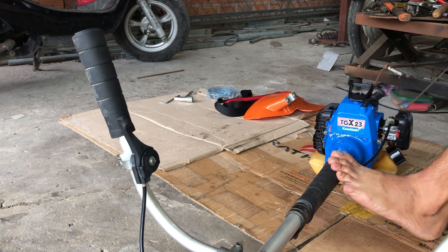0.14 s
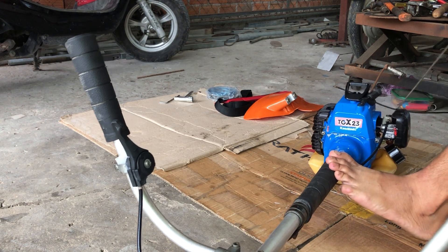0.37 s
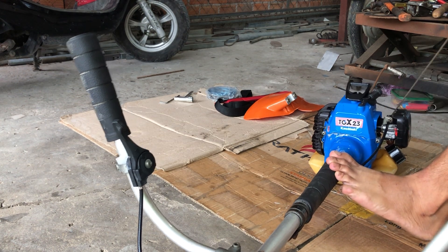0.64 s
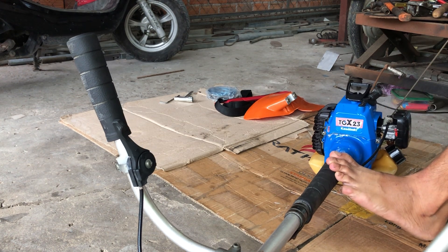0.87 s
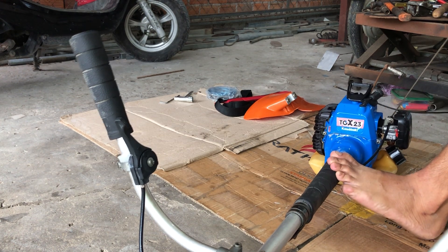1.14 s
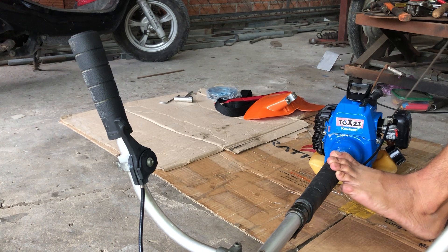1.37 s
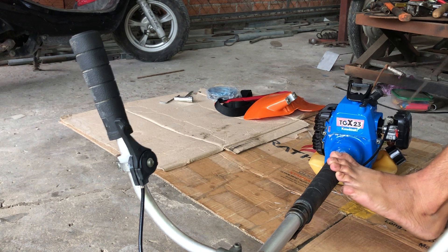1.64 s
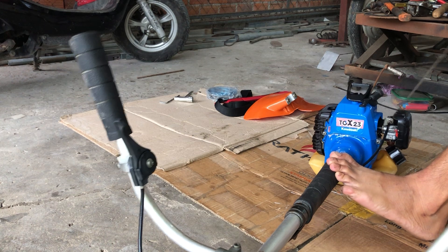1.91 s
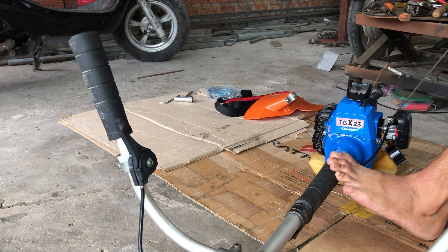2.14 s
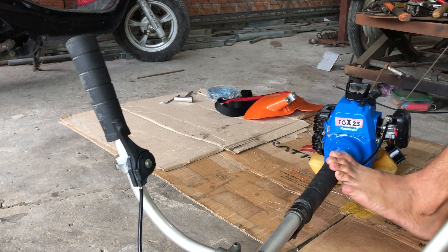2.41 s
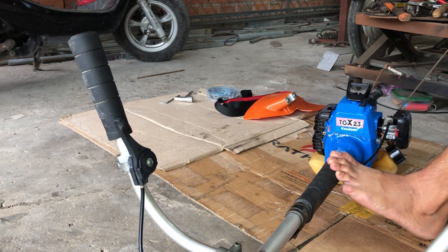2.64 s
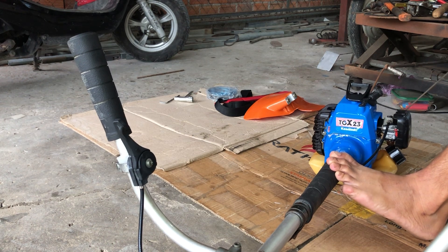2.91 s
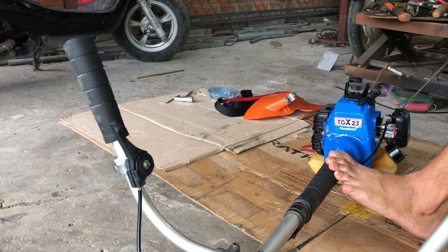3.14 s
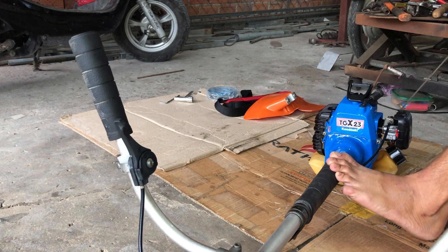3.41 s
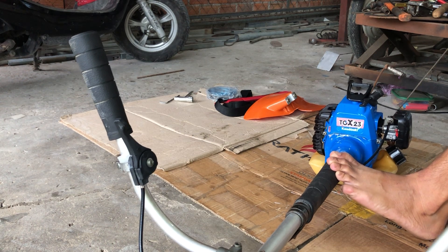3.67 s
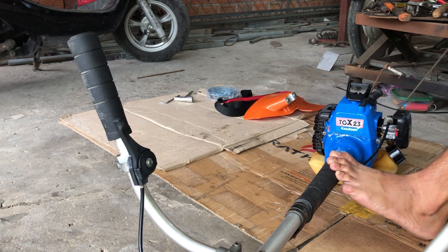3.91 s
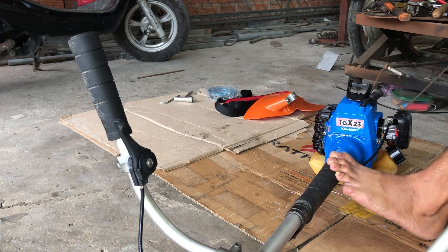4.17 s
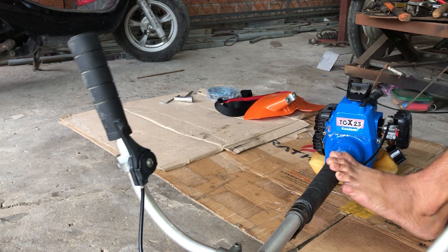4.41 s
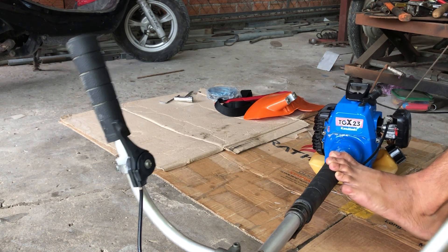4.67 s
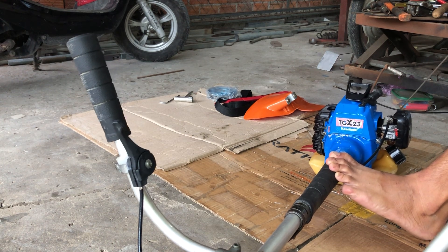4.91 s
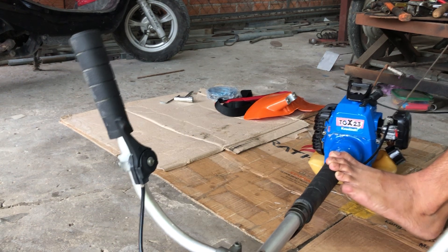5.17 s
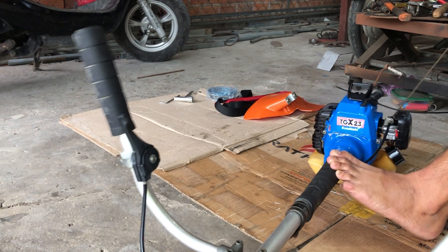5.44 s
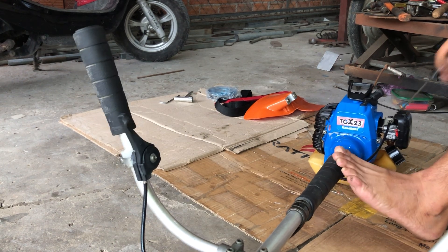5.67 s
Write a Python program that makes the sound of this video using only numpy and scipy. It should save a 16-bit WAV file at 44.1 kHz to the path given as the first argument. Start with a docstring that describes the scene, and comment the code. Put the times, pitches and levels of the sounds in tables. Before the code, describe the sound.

Close view of a garden-tool engine on a concrete garage floor. Three or four separated compression thumps with scraping and breathy puffs come first, then a quick springy ratchet whirr and a hard clack. This repeats twice more, until a stronger thump lights the engine and a loud, fast, uneven putter with rattling metal runs to the end. Light garage echo over quiet steady rumble.

```python
"""A small two-stroke engine is turned over by its starter rope on a garage floor, then catches and idles.
Each slow turn is a noise clack over top dead centre, an exhaust thump of damped muffler modes and a thin puff of
air. Between pulls the rope rewinds over a ratchet of ticks and ringing spring modes, and the pawl bangs in again.
Once firing, clatter, exhaust beats and puffs come forty-odd times a second, with loose metal rattling.
Soft tank knocks, a steady low rumble and the reverberation of the garage complete the scene."""
import sys
import numpy as np
from scipy import signal
from scipy.fft import rfft, irfft
from scipy.io import wavfile

SR = 44100
rng = np.random.default_rng(int(sys.argv[2]) if len(sys.argv) > 2 else 0)


def voltage_ratio(decibels):
    """Convert decibels (scalar or array-like) to amplitude ratios, 20 dB per decade."""
    exponent = np.asarray(decibels, float) / 20
    return 10 ** exponent


def waveform_to_disk(signal):
    """Save audio, clipped to [-1, 1], as 16-bit WAV at the path in sys.argv[1]."""
    frames = np.transpose(np.atleast_2d(signal))
    scaled = np.clip(frames, -1, 1) * 32767
    samples = np.round(scaled).astype(np.int16)
    wavfile.write(sys.argv[1], SR, samples)


N = 255950

# the pawl catches the flywheel: start_s, level_db
PAWL_CATCHES = [(1.64, -17.5), (2.993, -20), (4.217, -19)]
# noise spectra of the clack, the starter housing and rubbing parts: frequency_hz, level_db
CLACK_COLOUR = [(240, -41), (400, -24.5), (687, 1.5), (1460, -18), (2020, 1.5), (2360, -7.5), (5270, -13.5),
                (5870, -13), (6950, -19.5), (8630, -10.5), (10200, -24), (12700, -15.5), (16000, -26)]
HOUSING_COLOUR = [(240, -7), (400, -8), (475, -10.5), (596, 8), (842, 4), (947, -5), (1200, 7),
                  (1300, -4.5), (1770, -7), (2280, 2), (3500, -15.5), (4550, -83), (7700, -120)]
RUBBING_COLOUR = [(240, -59), (400, -24), (949, 0), (1060, -59), (1220, 5), (1560, -0.5), (1960, 0.5),
                  (3530, -9.5), (10100, -17), (11000, -14.5), (16000, -69)]


def rms_one(x):
    """Normalisation: scale a signal to unit rms."""
    return x / np.sqrt(np.mean(x ** 2) + 1e-20)


def coloured(spectrum, peaks=()):
    """Spectral shaping: white noise is weighted by a spectrum and resonant bumps, to unit rms."""
    hz = np.arange(N // 2 + 1) * SR / N + 1
    spectrum_hz, spectrum_db = np.transpose(spectrum)
    db = np.interp(np.log(hz), np.log(spectrum_hz), spectrum_db)
    for centre_hz, width_hz, top_db in peaks:
        db = db + top_db / (1 + (2 * (hz - centre_hz) / width_hz) ** 2)
    return rms_one(irfft(rfft(rng.standard_normal(N)) * voltage_ratio(db), N))


def clicks(s, db):
    """Impulse excitation: one single-sample impulse per event."""
    out, at = np.full(N, 1e-18), (np.asarray(s) * SR).astype(int)
    inside = (at >= 0) & (at < N)
    out[at[inside]] += voltage_ratio((db + 0 * at)[inside])
    return out


def swell(x, rise_s, t60):
    """Exponential relaxation: each impulse becomes an envelope that rises and dies away."""
    rise_pole, decay_pole = np.exp(-1 / (rise_s * SR)), voltage_ratio(-60 / (t60 * SR))
    decaying = signal.lfilter([1], [1, -decay_pole], x)
    return signal.lfilter([1 - rise_pole], [1, -rise_pole], decaying)


def approach(x, t60):
    """Time-reversed relaxation: an envelope grows towards each impulse."""
    return swell(x[::-1], rise_s=0.00051, t60=t60)[::-1]


def later(x, s):
    """Propagation delay: the signal arrives s seconds later."""
    return np.concatenate([np.zeros(int(s * SR)), x])[:N]


def grain(rough_db, hz):
    """Amplitude modulation: low-passed noise makes the level of rubbing contact uneven."""
    slow = signal.sosfilt(signal.butter(2, hz, fs=SR, output="sos"), rng.standard_normal(N))
    return voltage_ratio(rough_db * rms_one(slow))


def ring(x, modes):
    """Modal synthesis: the input sets decaying sines ringing."""
    out = 0
    for hz, db, t60 in modes:
        radius, angle = voltage_ratio(-60 / (t60 * SR)), 2 * np.pi * hz / SR
        poles = [1, -2 * radius * np.cos(angle), radius * radius]
        out = out + signal.lfilter([0, voltage_ratio(db) * np.sin(angle)], poles, x)
    return out


def burst(rows, colour, rise_s, t60, trim_db, rough_db=2.5):
    """Transient noise: each event is a short uneven burst of one colour."""
    s, db = np.transpose(rows)[:2]
    return swell(clicks(s, db + trim_db), rise_s, t60) * coloured(colour) * grain(rough_db, hz=320)


def rumble():
    """Stationary noise: far low rumble with narrow resonances and a slowly wandering level."""
    # noise spectrum: frequency_hz, level_db
    rumble_colour = [(18, -69), (30, -9), (124, 0.5), (266, -14), (649, -22), (740, -21), (962, -26),
                     (1040, -27.5), (3490, -37), (8980, -43), (16000, -59)]
    # resonances: centre_hz, width_hz, height_db
    rumble_peaks = [(111.6, 4.3, 13.6), (159, 4.7, 1.3), (168, 7, 12), (244, 14, 0.62), (9250, 530, 9.6)]
    return voltage_ratio(-46.5) * coloured(rumble_colour, rumble_peaks) * grain(rough_db=1.5, hz=1.54)


def clack(top):
    """Impact noise: the piston rocks over top dead centre, with a swell leading up to each impact."""
    envelope = swell(top, rise_s=0.00027, t60=0.066) + 0.66 * approach(top, t60=0.05)
    return envelope * coloured(CLACK_COLOUR) * grain(rough_db=2.0, hz=415)


def exhaust(blows, open_s, modes):
    """Resonator excitation: gas pulses through the opening port ring the muffler."""
    pulse = signal.windows.hann(int(open_s * SR))
    return -ring(np.convolve(blows, pulse)[:N] / (open_s * SR), modes)


def thump(s, db):
    """Cavity modes and early reflections: each slow exhaust blow rings the muffler and returns duller."""
    # modes of the muffler: frequency_hz, level_db, t60_s
    muffler = [(108.2, -4, 0.17), (178.7, -2, 0.1), (221.2, 0.5, 0.037), (355, -2.5, 0.014),
               (452, -18.5, 0.017), (564, -1.5, 0.024), (670, -18, 0.039), (890, -97, 0.015)]
    # floor and walls near the outlet: delay_s, gain
    exhaust_echoes = [(.0135, .6), (.0255, .28), (.036, .15)]
    gas = exhaust(clicks(s + 0.00373, db - 3.5), open_s=0.0019, modes=muffler)
    # a small outlet sends out little deep bass
    gas = signal.sosfilt(signal.butter(2, 95, "high", fs=SR, output="sos"), gas)
    dull = signal.sosfilt(signal.butter(1, 350, fs=SR, output="sos"), gas)
    return gas + sum(gain * later(dull, lag_s) for lag_s, gain in exhaust_echoes)


def casing_knocks(s, db):
    """Impact noise: the casing jumps on the floor, a knock and a weaker second one."""
    struck = clicks(s + 0.00044, db - 31.0) + clicks(s + 0.0221, db - 43.5)
    colour = coloured(CLACK_COLOUR) + 1.36 * coloured(HOUSING_COLOUR)
    return swell(struck, rise_s=0.00047, t60=0.32) * colour


def carburettor_puff(s):
    """Turbulent flow noise: air squeezed past the carburettor, after which the air box sings on."""
    # noise spectrum of the puff: frequency_hz, level_db
    puff_colour = [(710, 2), (1200, -3), (1380, -6), (1930, 7), (3320, -3), (4410, 7), (5130, -4),
                   (5780, 0.5), (6870, -8), (8350, 3), (9820, -10.5), (12900, 10), (16000, -18)]
    puff_db = -27   # ahead of the trims
    rows = np.transpose([s, puff_db + 0 * s])
    puff = burst(rows, puff_colour, rise_s=0.0038, t60=0.057, trim_db=-2.5, rough_db=0.0)
    tail = burst(rows, puff_colour, rise_s=0.017, t60=0.3, trim_db=-23.5)
    hum = ring(swell(clicks(s, puff_db - 33.5), rise_s=0.0019, t60=0.018), [(221.6, 0, 0.35)])
    return puff + tail + hum


def rubbing(top, top_s, puff_s):
    """Friction noise: parts rub from each clack or pawl catch until the puff, when the crank stalls."""
    t = np.arange(N) / SR
    starts = np.sort(np.append(top_s, np.array(PAWL_CATCHES)[:, 0]))
    stalls = puff_s + 0.04
    last_start = starts[np.searchsorted(starts, t) - 1]
    last_stall = np.append(-1, stalls)[np.searchsorted(stalls, t)]
    moving = signal.lfilter([.003], [1, -.997], 1. * (last_start > last_stall))   # soft on and off
    rub = voltage_ratio(-54.0) * moving * grain(rough_db=1.0, hz=88) + 1.1 * approach(top, t60=0.013)
    return rub * coloured(RUBBING_COLOUR)


def cranking():
    """Compression cycle: each slow turn scrapes up to a clack, then thumps, knocks and puffs."""
    # slow turns, the last one lights; port opening, length of the swing over compression, blow strength:
    # start_s, swing_s, level_db
    slow_turns = [(0.004, 0.098, -22), (0.33, 0.076, -17.5), (0.642, 0.062, -16), (1.012, 0.06, -17.5),
                  (1.726, 0.077, -17), (1.98, 0.063, -17), (2.317, 0.056, -14.5), (3.09, 0.078, -18.5),
                  (3.507, .070, -18.5), (4.313, 0.081, -16.5), (4.678, 0.079, -17), (5.038, 0.038, -9.5)]
    s, swing_s, db = np.transpose(slow_turns)
    top_s = s - .35 * swing_s    # shares of the swing before and after the port opens
    puff_s = s + .65 * swing_s
    top = clicks(top_s + 0.0039, -35)
    return (clack(top) + thump(s, db) + carburettor_puff(puff_s)
            + rubbing(top, top_s, puff_s) + casing_knocks(s, db))


def garage(x):
    """Reverberation: ten feedback delays, duller on every round, stepped block by block."""
    t60_s, wall_cut_hz = 0.47, 7040   # decay at low frequency; low-pass corner on each round
    out, dull = np.zeros(N), np.exp(-2 * np.pi * wall_cut_hz / SR)
    for k, lag in enumerate((np.geomspace(.013, .041, num=10) * SR).astype(int)):
        loop, gain, state = x.copy(), voltage_ratio(-60 * lag / SR / t60_s), [0.]
        for i in range(lag, N, lag):
            back, state = signal.lfilter([gain * (1 - dull)], [1, -dull], loop[i - lag:i], zi=state)
            loop[i:i + lag] += back[:N - i]
        out += (loop - x) * (-1) ** k
    return out


def tank():
    """Modal synthesis: the tank settles on the cardboard with soft hollow knocks."""
    # knocks: start_s, level_db
    settles = [(0.032, -37.5), (2.385, -36), (3.18, -39.5), (4.402, -40.5)]
    # modes of the tank: frequency_hz, level_db, t60_s
    tank_modes = [(524, 0.5, 0.057), (870, -8.5, 0.031), (1480, -9.5, 0.037)]
    contact = swell(clicks(*np.transpose(settles)), rise_s=0.00047, t60=.02)
    return ring(contact * rng.standard_normal(N) * voltage_ratio(-14), tank_modes)


def ratchet():
    """Ratchet kinematics: two pawls snap in turn; returns times and tick, knock and ring levels."""
    # the first pawl snaps over once per turn of the spool: start_s, level_db
    spool = [(1.281, -23), (1.331, -20.5), (1.366, -15.5), (1.398, -20.5), (1.429, -20.5), (1.4704, -23),
             (1.527, -29), (2.613, -24.5), (2.6802, -19.5), (2.7306, -17), (2.7793, -24), (2.833, -21),
             (3.8264, -23.5), (3.8753, -19), (3.915, -22.5), (3.9532, -17.5), (3.996, -22), (4.059, -28.5)]
    # the second pawl drops once more as the spool settles: start_s, level_db
    last_ticks = [(1.6037, -26.5), (2.865, -23), (4.1829, -23)]
    second_db, second_knock_db, second_ring_db = -20, -40.5, -63
    s, db = np.transpose(spool)
    turn_s = np.diff(s)
    # the second pawl follows at .62 of a turn, counting a turn as at most 1.15 times the one before
    expected_s = np.minimum(turn_s, 1.15 * np.append(1, turn_s[:-1]))
    second_s = (s[:-1] + .62 * expected_s)[turn_s < .08]   # longer gaps have no second snap
    last_s, last_db = np.transpose(last_ticks)
    seconds_db = np.append(second_db + 0 * second_s, last_db)
    softer_db = seconds_db - second_db
    first_ring_db = -35.5 + 1.2 * (db + 24.5)   # ringing grows faster than the tick
    return (np.concatenate([s, second_s, last_s]),
            np.append(db, seconds_db),
            np.append(db - 12, second_knock_db + softer_db),
            np.append(first_ring_db, second_ring_db + 2 * softer_db))


def ticks(s, db):
    """Impact noise: a sharp tick and a weak long tail at every ratchet tooth."""
    # noise spectrum of the tick: frequency_hz, level_db
    tick_colour = [(1760, -23), (3000, 6), (4080, -8), (5370, -4.5), (7000, -8.5), (8400, -5), (12100, -13),
                   (14800, -8.5), (16000, -2)]
    rows = np.transpose([s, db])
    sharp = burst(rows, tick_colour, rise_s=0.00034, t60=0.07, trim_db=-14.0)
    return sharp + burst(rows, tick_colour, rise_s=.003, t60=0.34, trim_db=-36)


def spring(s, ring_db):
    """Modal synthesis: teeth ring the coil spring, every mode struck its own way."""
    # modes of the spring: frequency_hz, level_db, t60_s
    spring_modes = [(7190, -2, .06), (7250, -5, .05), (10530, -5, .06), (10620, -7, .045), (14160, -7, .05),
                    (14280, -9, .04), (4330, -9, .04), (5860, -13, .035)]
    # the coil keeps trembling
    sway = swell(clicks(s, ring_db - 46), rise_s=0.004, t60=0.4) * grain(rough_db=4.0, hz=100)
    uneven_db = 4.0 * rng.standard_normal((len(s), len(spring_modes)))
    out = 0
    for mode, own_db in zip(spring_modes, uneven_db.T):
        strike = swell(clicks(s, ring_db - 23.5 + own_db), rise_s=0.00022, t60=0.019)
        out = out + ring((strike + sway) * rng.standard_normal(N), [mode])
    return out


def pawl_bang():
    """Impact noise: the pawl bangs into the flywheel, a crack with a longer tail."""
    # noise spectrum of the bang: frequency_hz, level_db
    bang_colour = [(240, -14), (400, -32), (616, 2), (1160, -3.5), (1490, -12), (2970, -6), (3210, -8),
                   (5030, -18), (7400, -18.5), (8900, -12), (10200, -22.5), (11000, -10.5), (13100, -21),
                   (15000, -8), (16000, -42)]
    crack = burst(PAWL_CATCHES, bang_colour, rise_s=0.0005, t60=0.03, trim_db=-3)
    return crack + burst(PAWL_CATCHES, bang_colour, rise_s=0.0008, t60=0.2, trim_db=-18.5)


def starter():
    """Impact excitation: ratchet teeth tick, knock the housing and ring the spring; the pawl bangs in."""
    # the rope handle nudges the housing: start_s, level_db
    handle = [(1.154, -47), (1.223, -48.5), (3.772, -40.5)]
    s, db, knock_db, ring_db = ratchet()
    knocks = clicks(s, knock_db) + clicks(*np.transpose(handle))
    knock = swell(knocks, rise_s=0.0051, t60=0.078) * coloured(HOUSING_COLOUR) * grain(rough_db=1.5, hz=216)
    # rope over the spool
    drag = swell(voltage_ratio(-20) * knocks, rise_s=0.0049, t60=0.35)
    drag = drag * coloured(RUBBING_COLOUR) * grain(rough_db=-1.0, hz=250)
    return ticks(s, db) + knock + drag + spring(s, ring_db) + pawl_bang()


def radiated(blows, spread_s):
    """Radiation by acceleration of flow: a smooth puff of gas is heard as a dip between two humps."""
    t = np.arange(-5 * spread_s, 5 * spread_s, 1 / SR) / spread_s
    return np.convolve(blows, (t ** 2 - 1) * np.exp(-t ** 2 / 2), "same")


def beats(burnt, missed):
    """Pipe reflection: each blow returns; a missed one is thinner and late, as the cylinder refills."""
    # modes of the muffler once firing: frequency_hz, level_db, t60_s
    hot_muffler = [(195, 0, .06), (370, -4, .04), (620, -10, .03)]
    blow_s, return_s = .00072, .00108   # spread of the puff at the port, and of its returning wave
    back = .8 * later(burnt, s=.005) + .75 * later(missed, s=.0114)
    direct = radiated(burnt, blow_s) + radiated(missed, 0.97 * blow_s)
    ringing = exhaust(later(burnt, s=.0027) + .6 * later(missed, s=.0091), open_s=.002, modes=hot_muffler)
    return direct + radiated(back, return_s) + voltage_ratio(-25) * ringing


def bark(opens, strength_db, missed, first_s):
    """Pulse-train radiation: burnt and missed exhaust beats, growing as the exhaust warms up."""
    burnt_blows = clicks(opens[~missed], strength_db[~missed])
    missed_blows = clicks(opens[missed], strength_db[missed] - 1)
    pulses = beats(burnt_blows, missed_blows)
    running_rms = np.sqrt(np.mean(pulses[int(first_s * SR):] ** 2))
    growth_db = 1.5 * (np.arange(N) / SR - first_s)   # 1.5 dB per second
    return voltage_ratio(-27.5 + growth_db) * pulses / running_rms


def jingle(on):
    """Random modal excitation: screws and shrouds are shaken, each contact ringing one of 24 parts."""
    hits = rng.random(N) < on * 1200 / SR   # 1200 per second on average
    struck = hits * voltage_ratio(3 * np.minimum(rng.exponential(1, N), 2.5))
    part = rng.integers(0, 24, N)
    out = 0
    for k, hz in enumerate(np.geomspace(1900, 15300, num=24)):
        contact = swell(struck * (part == k) + 1e-18, rise_s=0.0018, t60=0.012)
        out = out + ring(contact * rng.standard_normal(N), [(hz, -60, .025)])
    return out


def running_clatter(opens, beat_db, first_s):
    """Amplitude-modulated noise: mechanical clatter pulses with the crank, over a jingle of small parts."""
    # noise spectrum of the clatter: frequency_hz, level_db
    clatter_colour = [(200, -7), (500, -3), (660, -3), (780, -9), (1040, -14.5), (1250, -9.5), (1650, -14),
                      (2280, -11.5), (3800, -24.5), (6200, -24), (9300, -21.5), (12900, -24), (15500, -21),
                      (16300, -66)]
    on = np.clip((np.arange(N) / SR - first_s) / 0.028 + 1, 0, 1)   # full at the first firing
    beat = 0.38 + swell(clicks(opens + 0.0097, beat_db), rise_s=0.0038, t60=0.027)
    return voltage_ratio(-27) * on * beat * coloured(clatter_colour) * grain(rough_db=2.0, hz=298) + jingle(on)


def intake(s, puff_db):
    """Turbulent flow noise: a thin high puff about a third of a turn after each firing time."""
    puff_s = s + 0.34 * np.gradient(s)
    puff = voltage_ratio(-31.5) * swell(clicks(puff_s, puff_db), rise_s=0.0019, t60=0.032)
    return puff * coloured([(8000, -33), (11500, -20), (12600, 16), (13500, -6), (15000, -62)])


def rattle():
    """Modal synthesis and impact noise: loose metal rattles on the running engine."""
    # rattles: start_s, level_db
    rattles = [(5.0868, -15), (5.366, -11.5), (5.457, -13), (5.524, -13.5), (5.592, -9.5), (5.675, -11)]
    # noise spectrum of the rattle: frequency_hz, level_db
    rattle_colour = [(1760, -40), (3000, 1), (5070, 0), (5880, 6), (6300, -2), (7560, 8.5), (11000, 1.5),
                     (15100, 4), (16000, -25)]
    # modes of the loose metal: frequency_hz, level_db, t60_s
    loose_metal = [(5820, -8, .1), (6660, -2, .15), (6830, 0, .15), (7480, -2, .08), (8400, -4, .1),
                   (9400, -2, .1), (13720, -5, .15)]
    s, db = np.transpose(rattles)
    shake = swell(clicks(s, db - 53.0), rise_s=0.0053, t60=0.16)
    metal = sum(ring(shake * rng.standard_normal(N), [mode]) for mode in loose_metal)
    return metal + burst(rattles, rattle_colour, rise_s=0.0011, t60=0.083, trim_db=-14.5)


def engine():
    """Two-stroke cycle: one beat per turn, burnt or missed; clatter and puff follow the crank."""
    # crank position once firing: time_s, position_turns
    crank = [(5.0888, 0), (5.1935, 4), (5.296, 8), (5.394, 12), (5.485, 16), (5.5745, 20), (5.6596, 24),
             (5.745, 28), (5.832, 32)]
    # turns on which the charge fails to light: turn_index
    misfires = [0, 2, 4, 6, 9, 11, 15, 18, 21, 25, 28, 29]
    turn = np.arange(crank[-1][1])
    s = np.interp(turn, np.array(crank)[:, 1], np.array(crank)[:, 0])
    chance = rng.standard_normal((len(turn), 4))
    missed = np.isin(turn, misfires)
    opens = s - .0008 * missed + .0004 * chance[:, 0]
    pulses = bark(opens, 1.0 * chance[:, 1], missed, first_s=s[0])
    clatter = running_clatter(opens, 1.1 * chance[:, 2], first_s=s[0])
    return pulses, clatter + intake(s, 0.7 * chance[:, 3]) + rattle()


def scene():
    """Superposition: the machine, its garage reverberation and the far rumble add."""
    pulses, mechanism = engine()
    machine = cranking() + tank() + starter() + mechanism
    sent = machine + .6 * pulses   # the outlet faces the microphone and the open door
    echo = garage(signal.sosfilt(signal.butter(1, 140, "high", fs=SR, output="sos"), sent))
    return (machine + pulses + voltage_ratio(-21) * echo + rumble())[None]


def band_limit(x):
    """A steep low-pass at the top of the band."""
    return signal.sosfilt(signal.butter(12, 17020, fs=SR, output="sos"), x)


def record(dry):
    """Band limitation: the microphone cuts the deepest bass and the very top."""
    dry = signal.sosfilt(signal.cheby2(10, 60, 17000, fs=SR, output="sos"), dry)
    mix = signal.sosfilt(signal.butter(4, 52, "high", fs=SR, output="sos"), dry)
    return band_limit(mix)


dry = scene()
out = record(dry)
waveform_to_disk(out)
```